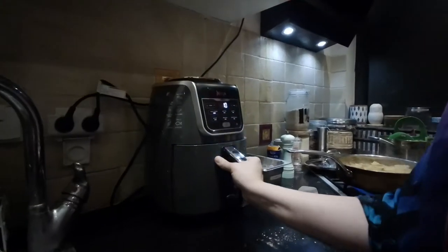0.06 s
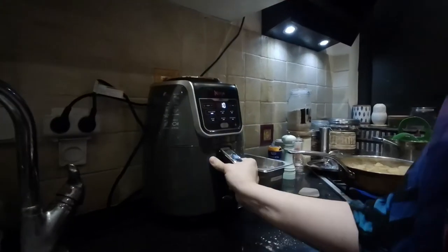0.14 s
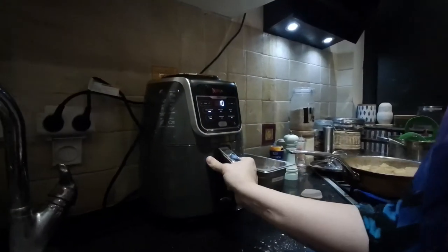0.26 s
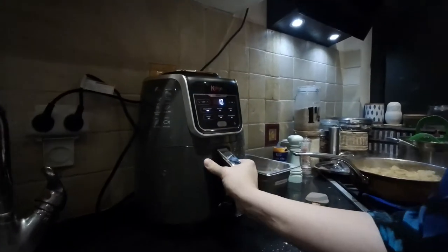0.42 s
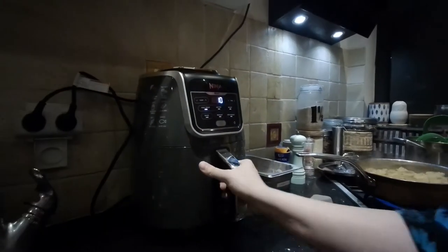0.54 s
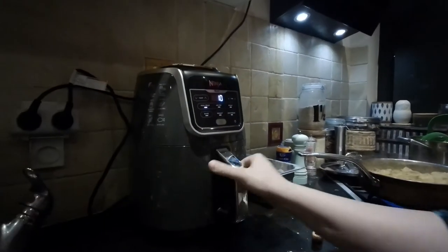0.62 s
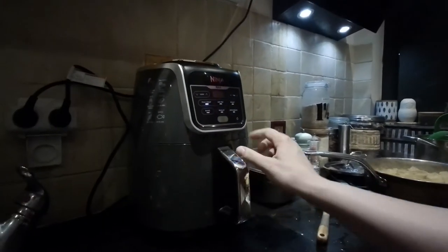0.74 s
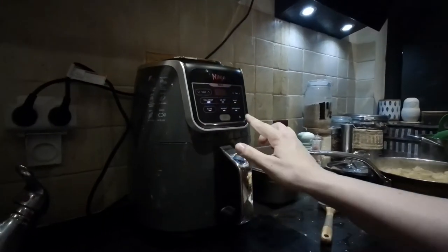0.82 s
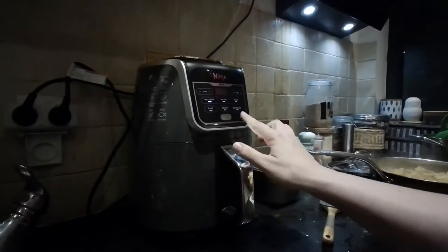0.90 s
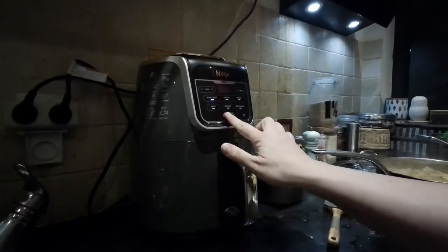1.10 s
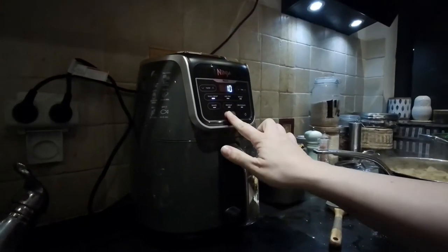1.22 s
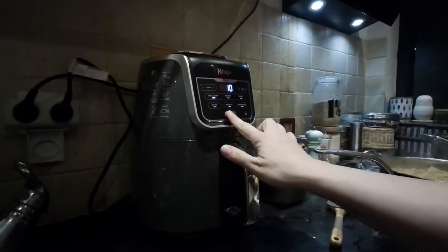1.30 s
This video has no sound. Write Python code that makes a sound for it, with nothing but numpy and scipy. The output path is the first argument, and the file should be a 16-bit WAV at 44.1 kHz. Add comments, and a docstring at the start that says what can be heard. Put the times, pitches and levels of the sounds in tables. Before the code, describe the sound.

One heavy, rattling thud of an air fryer basket pushed in, over a fan-like hum.

```python
"""A fan-like hum fills a small tiled kitchen. An air fryer basket scrapes briefly along its rails,
knocks against the catch and shuts with a heavy thud. The blows set the plastic housing booming,
loose parts rattle and the room reverberates. The metal pan then rings on low, and near the end
fingers touch the panel softly. From the first knock onward a very faint whine, probably electrical,
glides in and out."""
import sys
import numpy as np
from scipy import signal
from scipy.fft import rfft, irfft
from scipy.io import wavfile
from scipy.ndimage import uniform_filter1d, minimum_filter1d

SR = 44100
rng = np.random.default_rng(int(sys.argv[2]) if len(sys.argv) > 2 else 0)


def pcm_store(signal):
    """Save signal as 16-bit PCM."""
    levels = np.round(np.clip(np.atleast_2d(signal), -1, 1) * 32767)
    wavfile.write(sys.argv[1], SR, levels.astype(np.int16).T)


N = 59535

# spectrum of the hum's air noise (frequency [Hz], relative density [dB])
HUM_SPECTRUM = [(25, -11), (60, -11), (140, 7), (240, -3.5), (480, 0.5), (740, -3.5), (870, 1), (1150, -7),
                (1650, -10), (2050, -5), (2600, -22.5), (3400, -19.5), (4200, -24.5), (7200, -25),
                (11500, -33), (15500, -29.5)]
# envelope of the air noise (time [s], level [dB])
HUM_ENVELOPE = [(0, -56), (.12, -54), (1.35, -54.5)]
# tones within the hum (frequency [Hz], mean rms level [dB])
HUM_PARTIALS = [(296, -68), (441, -73), (865, -68.5), (6002, -81)]
HUM_WAVER_DB = .5

# glides of the whine, one list for each (time [s], frequency [Hz], level [dB])
WHINE_GLIDES = [
    [(.24, 15650, -74.5), (.255, 11500, -71.5), (.28, 8330, -66), (.295, 9800, -69.5), (.32, 10300, -68),
     (.345, 12800, -68), (.37, 15500, -74)],
    [(.715, 15300, -83), (.735, 14500, -62), (.755, 15400, -78)],
    [(.89, 15300, -73), (.94, 14200, -72), (.975, 14800, -75)],
    [(1.04, 15130, -73), (1.09, 14900, -67), (1.125, 11300, -72), (1.15, 5840, -63), (1.165, 4800, -75),
     (1.195, 6430, -63.5), (1.217, 5300, -69), (1.237, 6310, -64), (1.252, 6240, -60), (1.272, 9100, -66),
     (1.293, 9460, -69.5), (1.325, 7600, -57.5), (1.35, 6770, -65)],
]
WHINE_JITTER, WHINE_FLICKER_DB, WHINE_OCTAVE_DB = 0.017, 4.5, -12

# finger touches on the panel (time [s], level [dB])
FINGER_TOUCHES = [(1.045, -50), (1.127, -54.5), (1.167, -50), (1.244, -51)]
# spectrum of a touch (frequency [Hz], relative density [dB])
TOUCH_SPECTRUM = [(100, -25), (300, 1), (500, 7), (700, -7), (1200, 2), (1600, -8.5), (2100, -26),
                  (3000, -30), (10000, -36)]
TOUCH_T60_S, TOUCH_RISE_S = 0.15, 0.0036

# spectrum of friction on the rails (frequency [Hz], relative density [dB])
SLIDE_SPECTRUM = [(50, -33), (130, 5.5), (290, 1.5), (380, -10), (480, -16), (800, 0), (1300, -16.5),
                  (2200, -21.5), (3500, -35.5), (12000, -58.5)]
SLIDE_START_S, SLIDE_END_S, SLIDE_RISE_S = 0.18, 0.247, 0.061
SLIDE_DB, SLIDE_GRAINS_PER_S = -37.5, 3000
JUDDER_S, JUDDER_HALF_WIDTH_S, JUDDER_HZ, JUDDER_DB = 0.2185, 0.013, 465.3, -37.5

# spectrum of the kitchen's reverberation (frequency [Hz], relative density [dB])
ROOM_SPECTRUM = [(30, -31), (70, -20.5), (110, -15.5), (300, 2), (400, -0.5), (780, -0.5), (1000, -7),
                 (1250, -14), (1600, -22), (2000, -17), (2600, -29), (3400, -24.5), (6000, -51),
                 (7200, -40.5), (10000, -54), (16000, -68)]
# reverberation time (frequency [Hz], T60 [s])
ROOM_DECAY = [(80, 0.88), (200, 0.25), (600, 0.25), (1500, 0.3), (3400, 0.22), (8000, 0.19)]
ROOM_DB, ROOM_RISE_S = -20.5, 0.0016

# clicks of the catch and loose tray (time [s], relative level [dB], low-pass corner [Hz])
RATTLE_CLICKS = [(.2565, -11, 9000), (0.262, 0, 14000), (0.2633, -2, 12000), (0.2665, -2, 10000),
                 (0.2862, 1.5, 5500), (0.2931, 0, 7500), (0.2984, -7.5, 8500), (.3095, -9.5, 8000),
                 (.3265, -14, 7000)]
# spectrum of a click before its low-pass (frequency [Hz], relative density [dB])
CLICK_SPECTRUM = [(500, -10), (2000, 15.5), (2700, -8.5), (4500, 4), (6000, -4.5), (7000, 1.5), (9000, -14),
                  (13000, -21.5), (16000, -34)]
CLICK_DB, CLICK_T60_S, CLICK_ROOM_DB, CLICK_ROOM_T60_S = -33, .018, -10.5, 0.23

# low modes of the metal pan, the close pair beating (frequency [Hz], level [dB], T60 [s])
PAN_MODES = [(126.8, -45.5, 1.37), (172.95, -36.5, 1.74), (194, -36, 0.91)]
PAN_STRUCK_S, PAN_WAVER_DB = .286, 1.2
# spectrum of the loose tray shivering in the pan (frequency [Hz], relative density [dB])
TRAY_SPECTRUM = [(1500, -28), (2500, -2), (3000, -4.5), (3450, 2), (4000, -24), (6000, -44.5)]
TRAY_DB, TRAY_T60_S = -56, 0.71

# blows of the basket on the housing
# (time [s], relative force [dB], contact time [ms], low-mode gain [dB], reverberation gain [dB])
BASKET_BLOWS = [(.2451, -22, 0.23, 14.5, -12), (.2480, -4.5, 0.99, 8, -2.5), (.2525, 2.5, 1.96, 3.5, -8),
                (.2853, 3, 0.67, -4, 3), (.2909, -5, 0.63, 7.5, -6), (0.2961, -10.5, 0.43, -14, -17.5),
                (.3090, -14.5, 0.89, -2, -8), (0.363, -27.5, 0.98, -4, -25)]
# modes of the housing with the basket in it (frequency [Hz], relative level [dB], T60 [s])
HOUSING_MODES = [(105.5, -22, 0.23), (130.4, -14.5, .145), (161, -28, 0.16), (181.3, -31.5, 0.29),
                 (224, -24, 0.071), (264, -26.5, 0.15), (312.9, -18.5, 0.34), (400.7, -34, .15),
                 (484, -21, 0.148), (518.6, -16.5, 0.085), (669, -25, 0.26), (744.5, -27, 0.1),
                 (792.5, -4, .042), (900, -28, 0.12), (996, -20.5, 0.11)]
BOOM_BELOW_HZ, RADIATES_ABOVE_HZ = 285, 102

CEILING, TOP_HZ = .75, 15450


def undb(db):
    """Amplitude ratio of a level in decibels."""
    return 10 ** (np.asarray(db) / 20)


def along(points, hz):
    """Interpolation of a table on a logarithmic frequency axis."""
    frequencies, values = np.array(points).T
    return np.interp(np.log(np.maximum(hz, 1)), np.log(frequencies), values)


def colour(x, spectrum):
    """Spectral shaping by multiplication in the frequency domain, scaled to rms 1."""
    shaped = irfft(rfft(x) * undb(along(spectrum, np.fft.rfftfreq(N, 1 / SR))), N)
    return shaped / np.sqrt(np.mean(shaped ** 2))


def noise(spectrum):
    """Gaussian noise with a given spectrum, at rms 1."""
    return colour(rng.standard_normal(N), spectrum)


def since(start):
    """Elapsed seconds after an onset, zero before it."""
    return np.maximum(np.arange(N) / SR - start, 0)


def fade(t, t60):
    """Exponential decay of 60 dB in t60 seconds, silent before the onset."""
    return (t > 0) * np.exp(-np.log(1000) * t / t60)


def burst(t, t60, rise_s):
    """Envelope of exponential build-up and decay."""
    return fade(t, t60) * (1 - np.exp(-t / rise_s))


def drift(rate_hz):
    """Smoothed random fluctuation with unit standard deviation."""
    hold = int(SR / rate_hz)
    steps = np.repeat(rng.standard_normal(N // hold + 1), hold)
    smooth = uniform_filter1d(uniform_filter1d(steps, hold), hold)[:N]
    return smooth / smooth.std()


def ring(t, hz, db, t60):
    """Free vibration of one mode: a damped sinusoid."""
    return undb(db) * fade(t, t60) * np.sin(2 * np.pi * hz * t)


def kitchen_hum():
    """Broadband air noise and weak, wavering tones superpose into a fan-like hum."""
    t = since(0)
    level_db = np.interp(t, *np.array(HUM_ENVELOPE).T)
    air = noise(HUM_SPECTRUM) * undb(level_db + HUM_WAVER_DB * drift(20.9))
    tones = np.zeros(N)
    for hz, db in HUM_PARTIALS:
        amplitude = np.sqrt(2) * undb(db + 2.7 * drift(24.6))
        tones += amplitude * np.sin(2 * np.pi * hz * t + 0.54 * drift(9.9))
    return air + tones


def whine():
    """Frequency modulation: a thin tone with a weak octave swoops down from the top of hearing."""
    t, out = since(0), np.zeros(N)
    for glide in WHINE_GLIDES:
        times, hz, db = np.array(glide).T
        pitch = uniform_filter1d(np.interp(t, times, hz), size=400)
        phase = 2 * np.pi * np.cumsum(pitch * (1 + WHINE_JITTER * drift(1000))) / SR
        level_db = np.interp(t, times, db) + WHINE_FLICKER_DB * drift(120)
        sounding = (t > times[0]) * (t < times[-1])
        gain = uniform_filter1d(undb(level_db) * sounding, size=300)
        octave = undb(WHINE_OCTAVE_DB) * (2 * pitch < TOP_HZ) * np.sin(2 * phase)
        out += gain * (np.sin(phase) + octave)
    return out


def finger_touches():
    """Soft contact excites little treble: each touch on the plastic panel is a dull noise burst."""
    envelope = sum(undb(db) * burst(since(start), TOUCH_T60_S, TOUCH_RISE_S)
                   for start, db in FINGER_TOUCHES)
    return envelope * noise(TOUCH_SPECTRUM)


def rail_scrape():
    """Stick-slip friction: grains swell with speed and stop at the catch; the rail judders once."""
    t = since(0)
    grains = (rng.random(N) < SLIDE_GRAINS_PER_S / SR) * rng.standard_normal(N)
    speed = np.minimum(since(SLIDE_START_S) / SLIDE_RISE_S, 1) * np.exp(-since(SLIDE_END_S) / .01)
    scrape = undb(SLIDE_DB) * speed ** 1.07 * colour(grains, SLIDE_SPECTRUM)
    judder_envelope = np.exp(-((t - JUDDER_S) / JUDDER_HALF_WIDTH_S) ** 2)
    judder = judder_envelope * np.sin(2 * np.pi * JUDDER_HZ * t + .5 * drift(340))
    return scrape + undb(JUDDER_DB) * judder


def reverberation():
    """Diffuse field: the blows' reflections add in power, and each octave decays at its own rate."""
    diffuse = rfft(noise(ROOM_SPECTRUM))
    octave = np.log2(np.maximum(np.fft.rfftfreq(N, 1 / SR), 1))
    out = np.zeros(N)
    for hz in 31.25 * 2 ** np.arange(10):
        band = irfft(diffuse * np.maximum(1 - abs(octave - np.log2(hz)), 0), N)
        t60 = along(ROOM_DECAY, hz)
        power = sum((undb(db) * burst(since(start), t60, ROOM_RISE_S)) ** 2
                    for start, *_, db in BASKET_BLOWS)
        out += band * np.sqrt(power)
    return undb(ROOM_DB) * out


def rattle():
    """Brief impacts are broadband: clicks, bright at the catch, duller inside, reflect off the tiles."""
    out = np.zeros(N)
    for start, db, corner_hz in RATTLE_CLICKS:
        t = since(start)
        direct = fade(t, CLICK_T60_S)
        reflected = undb(CLICK_ROOM_DB) * fade(t, CLICK_ROOM_T60_S)
        click = np.hypot(direct, reflected) * noise(CLICK_SPECTRUM)
        lowpass = signal.butter(3, corner_hz, fs=SR, output="sos")
        out += undb(db) * signal.sosfilt(lowpass, click)
    return undb(CLICK_DB) * out


def pan_ring():
    """Light damping lets the metal pan's low modes outlast the thud, while its loose tray shivers."""
    t = since(PAN_STRUCK_S)
    modes = sum(ring(t, *mode) * undb(PAN_WAVER_DB * drift(20.7)) for mode in PAN_MODES)
    tray = undb(TRAY_DB) * fade(t, TRAY_T60_S) * noise(TRAY_SPECTRUM)
    return modes + tray


def housing_thud():
    """Force pulses excite the housing's modes: longer contact is duller, a squarer hit booms more."""
    out, frequencies = np.zeros(N), np.fft.rfftfreq(N, 1 / SR)
    for start, force_db, contact_ms, boom_db, _ in BASKET_BLOWS:
        modes = sum(ring(since(start), hz, db + boom_db * (hz < BOOM_BELOW_HZ), t60)
                    for hz, db, t60 in HOUSING_MODES)
        sigma_s = contact_ms / 4000  # contact spans four standard deviations of a Gaussian pulse
        pulse_spectrum = np.exp(-2 * (np.pi * frequencies * sigma_s) ** 2)
        out -= undb(force_db) * irfft(rfft(modes) * pulse_spectrum, N)
    radiation = signal.butter(5, RADIATES_ABOVE_HZ, "high", fs=SR, output="sos")
    return signal.sosfilt(radiation, out)


def scene():
    """Linear superposition of basket, fingers and background in one channel."""
    basket = housing_thud() + pan_ring() + reverberation() + rattle() + rail_scrape()
    return (basket + finger_touches() + kitchen_hum() + whine())[None]


def record(dry):
    """Peak and band limiting: a fast gain dip holds peaks down, then a steep low-pass cuts the top."""
    gain = minimum_filter1d(CEILING / np.maximum(abs(dry), CEILING), size=201)
    limited = dry * uniform_filter1d(gain, size=201)
    lowpass = signal.ellip(12, .2, 80, TOP_HZ, fs=SR, output="sos")
    return signal.sosfilt(lowpass, limited)


dry = scene()
out = record(dry)
pcm_store(out)
```